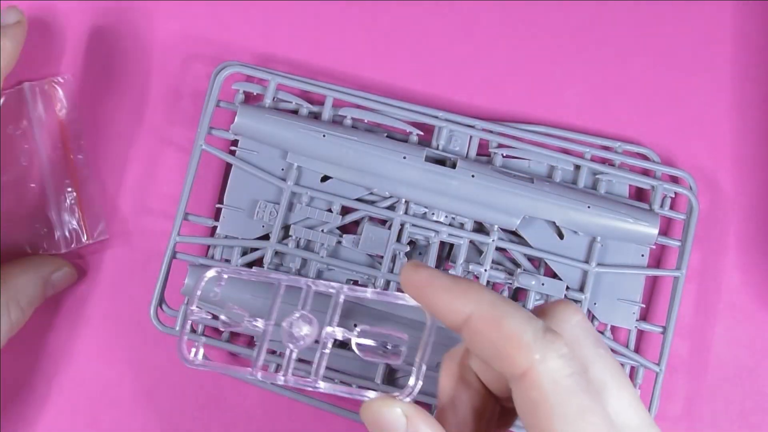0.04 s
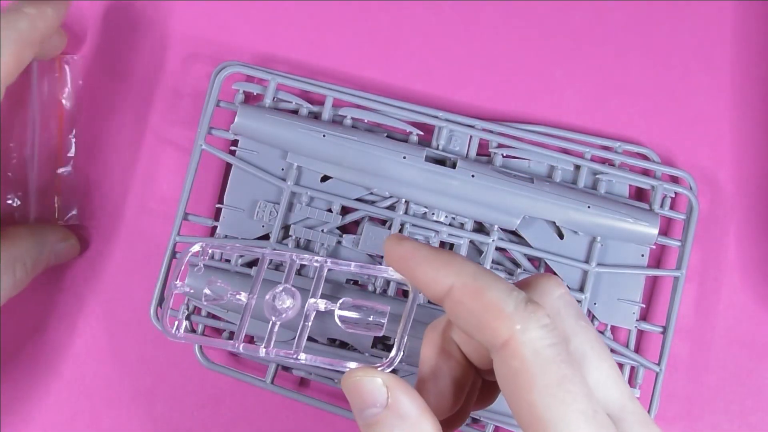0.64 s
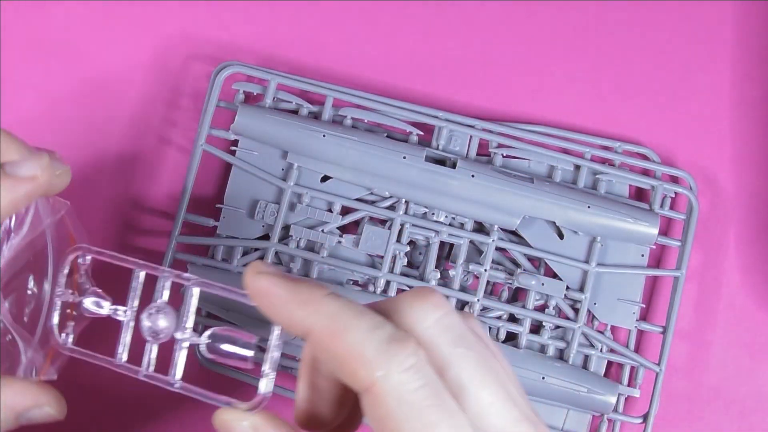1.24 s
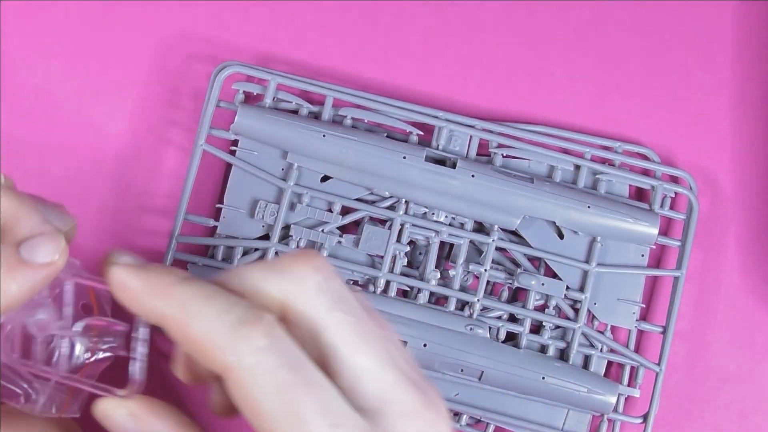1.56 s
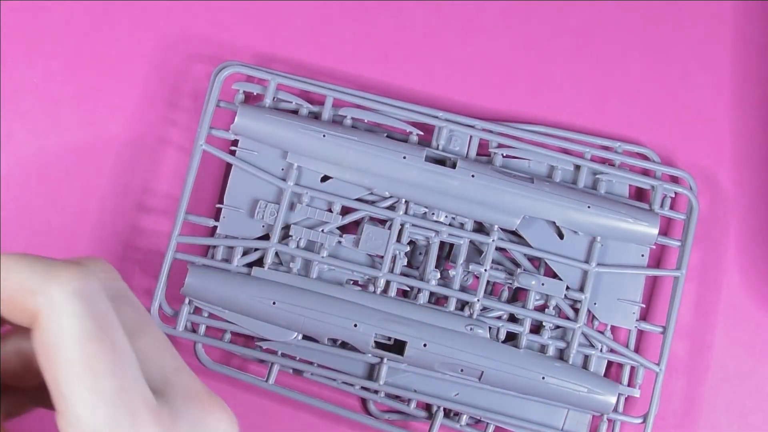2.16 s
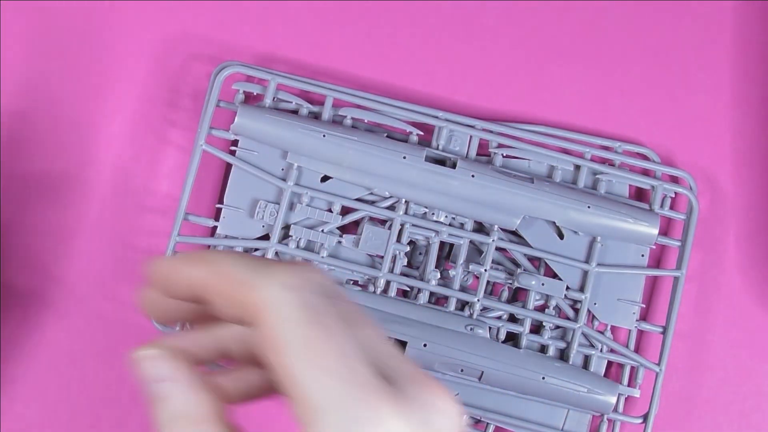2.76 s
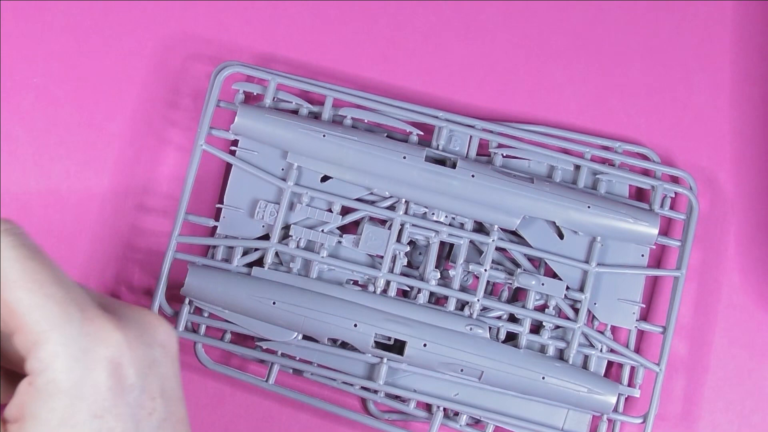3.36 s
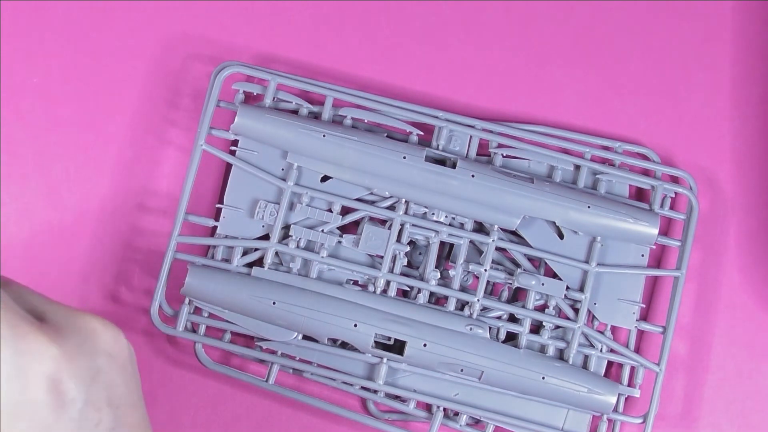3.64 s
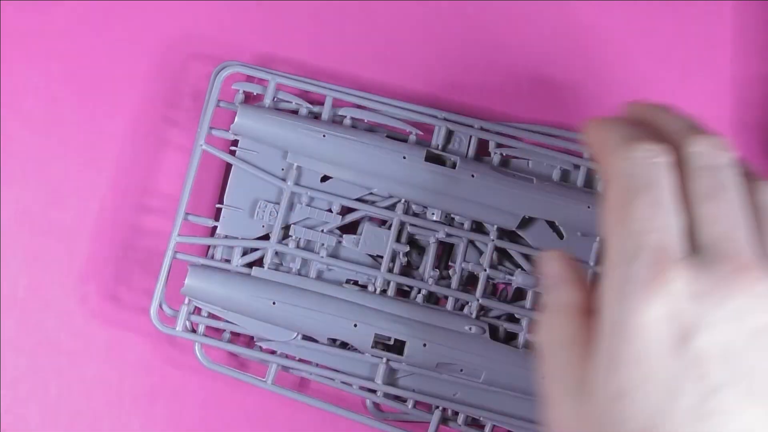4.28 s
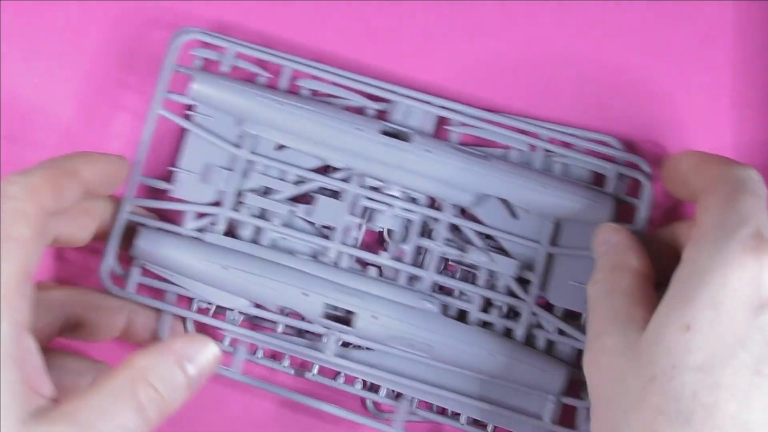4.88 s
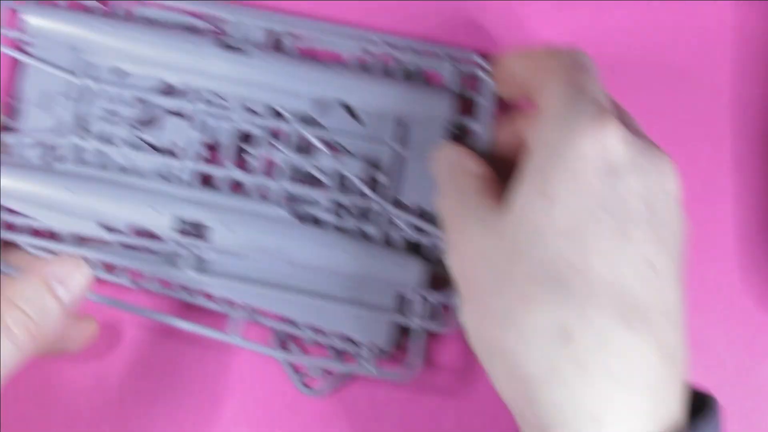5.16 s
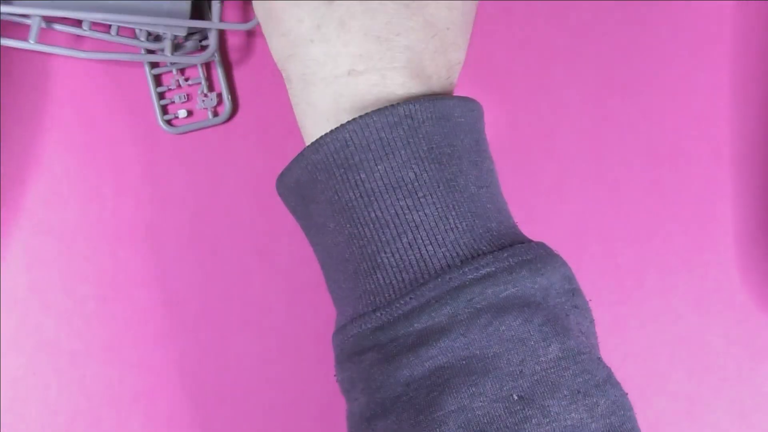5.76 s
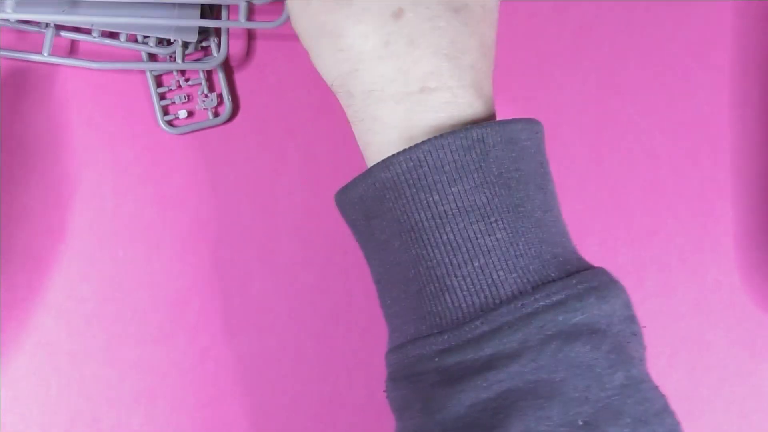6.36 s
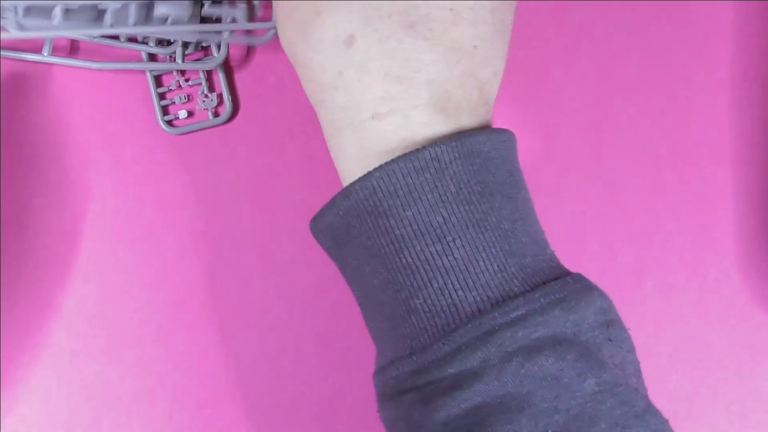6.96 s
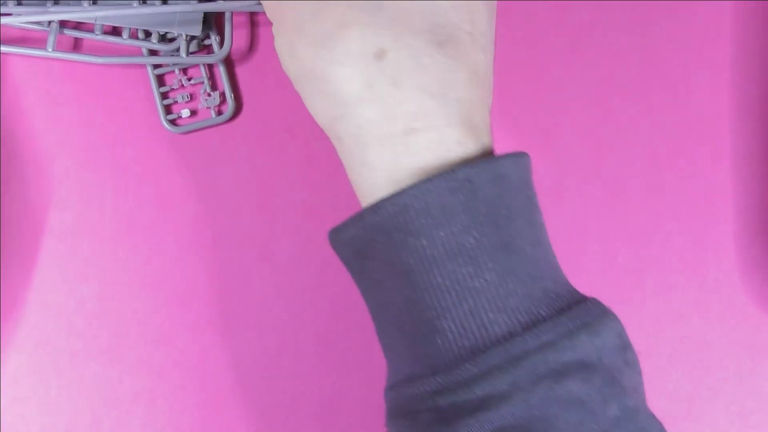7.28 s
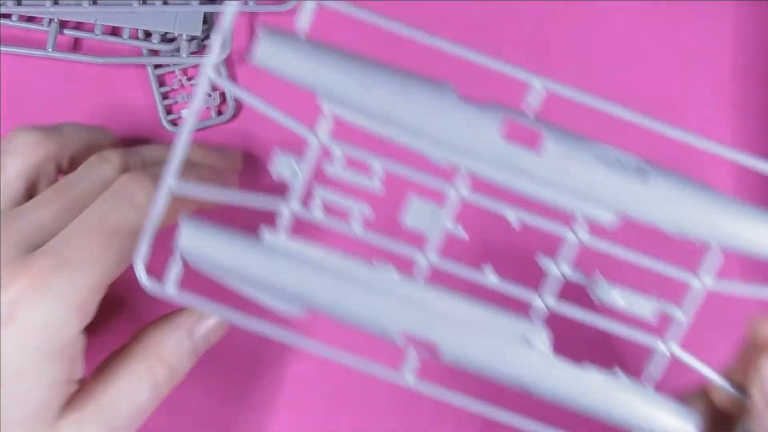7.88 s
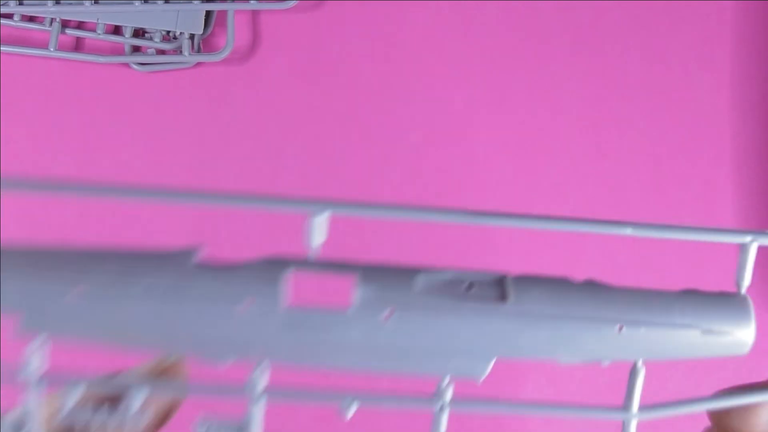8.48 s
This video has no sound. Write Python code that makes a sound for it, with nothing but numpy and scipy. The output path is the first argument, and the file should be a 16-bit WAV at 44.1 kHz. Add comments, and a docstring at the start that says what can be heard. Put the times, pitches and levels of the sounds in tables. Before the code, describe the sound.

A thin plastic bag crinkles and snaps, then plastic model part frames scrape and clatter on a table, with one louder knock.

```python
"""Plastic model parts handled on a covered table. A thin bag crinkles, snaps and rubs as a clear part is
slipped in; then a stack of part frames scrapes away, clatters down with one loud knock, and the top
frame is pulled off with a faint squeak. The table rumbles and booms underneath. A small, lively room
answers the handling; dull ticks from inside the camera reach its stereo microphone over a steady hush."""
import sys
import numpy as np
from scipy import signal
from scipy.fft import rfft, irfft
from scipy.io import wavfile

SR = 44100
rng = np.random.default_rng(int(sys.argv[2]) if len(sys.argv) > 2 else 0)


def generate_wav(sig):
    """Save sig (samples, or channels by samples) to the path in sys.argv[1] as 16-bit PCM at SR."""
    pcm = np.round(np.clip(np.atleast_2d(sig).T, -1, 1) * 32767).astype(np.int16)
    wavfile.write(sys.argv[1], SR, pcm)


N = 376173
TIME_S = np.arange(N) / SR

# Event levels are relative within each table; gains follow.
# Bag squeezes. Each row: start in seconds, length in seconds, crinkle in dB, rubbing in dB.
BAG_SQUEEZES = [(0.0, 0.045, -55, -64.5), (0.19, 0.12, -63, -72.5), (0.34, 0.11, -58.5, -64.5),
                (0.59, .17, -62, -69), (0.77, 0.18, -60, -65), (0.92, 0.11, -58, -70),
                (1.405, 0.055, -64.5, -62), (1.485, 0.13, -50, -53.5), (1.78, 0.2, -50.5, -55.5),
                (1.985, 0.034, -55, -52.5), (2.135, 0.039, -55.5, -69), (2.25, 0.12, -53, -60.5),
                (2.31, 0.049, -48.5, -59), (2.42, 0.056, -79, -61.5), (2.64, 0.17, -64, -68),
                (3.02, 0.13, -51, -56), (3.19, 0.075, -58, -58), (3.445, 0.023, -54.5, -54),
                (3.56, 0.15, -60.5, -58.5), (3.775, 0.018, -54.5, -55), (3.92, .1, -56.5, -53),
                (4.025, 0.084, -51.5, -60.5), (4.23, 0.17, -55, -62), (4.375, 0.017, -56.5, -55.5)]
# Weight landing on the table. Each row: start in seconds, level in dB.
TABLE_BOOMS = [(0.202, -61), (0.682, -56.5), (0.905, -62), (4.391, -57), (5.003, -49.5), (6.192, -51),
               (7.086, -46.5), (7.266, -49), (8.06, -45.5)]
# Clearest camera ticks. Each row: time in seconds, level in dB.
CLEAR_TICKS = [(0.2778, -41.5), (0.3125, -40.5), (0.3492, -42.5), (0.4286, -43.5), (0.5888, -41.5),
               (0.9105, -41), (0.9451, -39.5), (0.989, -44), (1.0688, -42), (1.2314, -41), (2.189, -41.5),
               (2.5097, -43), (2.8292, -43.5), (3.1503, -42.5), (3.469, -45), (3.7903, -45), (4.107, -42.5),
               (4.4283, -41.5), (4.7488, -37), (4.8274, -41.5), (4.9094, -39.5), (5.3885, -45),
               (6.0297, -42.5), (6.348, -46), (6.669, -46.5), (6.9895, -44)]
# Runs of fainter ticks. Each row: start in seconds, end in seconds, level in dB.
FAINT_TICK_RUNS = [(0.261, .54, -47.5), (0.707, .76, -46), (0.854, 1.09, -47.5)]
# Snaps of film or plastic. Each row: start in seconds, bright level in dB, ring in Hz, hollow level in dB.
PLASTIC_SNAPS = [(0.8276, -45, 7800, -55), (0.8553, -32, 6200, -46), (0.9682, -37, 9400, -34),
                 (1.138, -43.5, 7030, -49), (1.375, -59, 5800, -69), (1.487, -39, 10300, -50),
                 (1.494, -35.5, 7160, -44.5), (1.5325, -36.5, 7950, -59), (1.5665, -33.5, 7400, -47),
                 (1.5943, -36, 9500, -56), (1.6036, -48, 7200, -62), (1.6221, -33, 7400, -51),
                 (1.7896, -42, 7750, -37.5), (1.8424, -34.5, 6330, -37), (1.8746, -38.5, 6900, -53),
                 (2.0119, -35, 7000, -38), (2.145, -42.5, 8150, -37), (2.334, -35, 7300, -34.5),
                 (2.7997, -44.5, 5900, -51), (3.036, -45, 7250, -39.5), (3.0743, -41, 8600, -57),
                 (3.123, -41, 7800, -43), (3.2321, -43.5, 8100, -48), (3.4938, -38.5, 8600, -56),
                 (3.59, -50, 7400, -57), (3.7158, -43, 7000, -72), (3.81, -41.5, 7400, -39.5),
                 (4.2505, -43, 8200, -44.5), (4.2787, -45, 8700, -43.5), (4.3953, -69, 3850, -35),
                 (4.657, -43, 6900, -48), (6.814, -54, 6750, -67), (6.9704, -43.5, 7140, -47.5),
                 (7.058, -23, 7900, -34.5), (7.737, -78, 3500, -45.5)]
# Short shoves of the frames. Each row: start in seconds, length in seconds, scrape in dB, rasp in dB.
FRAME_SHOVES = [(4.505, .12, -56, -60.5), (4.635, 0.16, -51.5, -61), (4.84, 0.43, -52, -59),
                (5.67, 0.3, -57.5, -62.5), (5.95, 0.2, -52, -64.5), (6.19, 0.093, -62, -65.5),
                (6.39, 0.12, -57.5, -72), (6.6, 0.04, -70, -84), (7.012, .055, -43, -60),
                (7.072, 0.021, -26.5, -44), (7.26, 0.054, -48.5, -57.5), (7.43, 0.08, -63, -74),
                (7.85, 0.28, -63.5, -65.5), (8.04, 0.018, -38, -47), (8.44, 0.012, -56.5, -85)]
# Frame striking frame. Each row: start in seconds, level in dB, decay time in seconds.
FRAME_CLATTERS = [(4.995, -37, 0.0072), (5.004, -29, .015), (5.676, -35, 0.0053), (5.907, -41, 0.0028),
                  (5.959, -29.5, 0.0081), (5.985, -38, 0.0049), (6.038, -35, 0.0034), (6.052, -31, 0.0031),
                  (6.171, -42, .0045), (6.204, -41, 0.0072), (6.416, -48, .0041), (6.468, -47.5, 0.0084),
                  (6.607, -45, 0.015), (7.026, -39.5, 0.015), (7.068, -28.5, 0.0049), (7.079, -19, 0.012),
                  (7.086, -23, 0.0046), (7.151, -19.5, 0.006), (7.266, -28, 0.0054), (7.289, -37, 0.01),
                  (7.324, -34, 0.0044), (8.006, -43.5, 0.051), (8.034, -32, 0.0098), (8.062, -33.5, 0.034),
                  (8.218, -43, 0.0041), (8.453, -46, 0.0077)]
# Frame striking table. Each row: start in seconds, level in dB, pitch in Hz, decay time in seconds.
FRAME_BUMPS = [(4.998, -42, 300, 0.007), (5.699, -41, 364, 0.0098), (5.7142, -37.5, 421, 0.0043),
               (5.729, -45, 466, 0.012), (5.96, -50, 326, 0.031), (6.205, -51, 342, 0.0095),
               (7.065, -37.5, 276, 0.012), (7.095, -43, 336.5, 0.036), (7.11, -50, 177, 0.043),
               (7.139, -49, 322, 0.037), (7.27, -53, 176.5, 0.062), (7.859, -35, 455, 0.0027),
               (7.869, -51, 465, .012), (8.03, -39.5, 309, 0.013)]
# Squeak of the top frame dragging free. Each row: time in seconds, pitch in Hz, level in dB.
SQUEAK_CURVE = [(7.875, 1270, -66), (7.905, 1304, -53.5), (7.96, 1302, -60), (8.03, 1350, -57),
                (8.05, 1330, -81)]

# Spectra of the sources. Each row: frequency in Hz, relative gain in dB.
HUSH_SPECTRUM = [(15, -30), (25, -10), (36, 2.5), (72, -3), (734, -5), (1020, -8), (1740, -18.5),
                 (2110, -11), (2350, -13), (2690, -27), (3920, -14), (5000, -26), (7110, -7), (10100, -18),
                 (16000, -16)]
FILM_SPECTRUM = [(880, -41.5), (1500, -14.5), (1670, -9.5), (2320, -6.5), (2770, -9.5), (4160, -3.5),
                 (5020, -11), (5830, -4), (7460, -1), (8920, -3.5), (12400, -12.5), (15200, -22),
                 (16000, -14.5)]
RUB_SPECTRUM = [(150, -26.5), (300, -7), (480, -5), (700, 0.5), (850, -2.5), (1100, -5), (1350, -7.5),
                (1650, -20), (2500, -46)]
TABLE_SPECTRUM = [(20, -28), (55, -11.5), (95, -16), (121, 0.5), (145, -13), (175, -4), (200, -10),
                  (315, -7), (380, -9), (550, -10), (1000, -13.5), (2000, -22.5)]
HOLLOW_SPECTRUM = [(300, -29.5), (900, -10), (1600, -16), (2300, -11.5), (3500, -15), (6000, -23.5)]
SCRAPE_SPECTRUM = [(2650, -27), (4500, -7), (5080, -10.5), (6740, 1.5), (8240, -0.5), (12200, -12.5),
                   (15200, -21.5), (16000, -41)]
RASP_SPECTRUM = [(260, -27.5), (450, -9.5), (510, -33), (768, -13.5), (852, -32.5), (1260, -4.5),
                 (1630, -18), (1990, 1), (2840, -1.5), (3810, 5), (5060, -9.5), (5500, 0.5), (7150, -34),
                 (12100, -120)]
FRAME_SPECTRUM = [(400, -24), (550, -9.5), (1000, -10), (1600, -17.5), (2150, -7), (3100, -9), (3600, -4),
                  (4000, -1.5), (4450, -2), (5000, -8), (6300, 4), (7900, 8), (10000, -4), (16000, -35)]

# Room decay. Each row: frequency in Hz, time to fall 60 dB in seconds.
ROOM_T60 = [(100, 0.68), (400, 0.59), (1500, 0.64), (4000, 0.24), (8000, 0.2), (15000, 0.17)]
# Stereo width and balance by frequency.
# Each row: frequency in Hz, side gain in dB, left over right in dB, left lead in radians.
STEREO_IMAGE = [(101, 4.5, 2, -0.47), (452, 3, 1.65, -0.7), (990, -4.5, -0.1, -0.65), (2730, -15.5, 1, 0),
                (6450, -35.5, -1.2, 0), (9350, 1.5, -1.5, -0.14), (12100, 0.5, 0, 2), (15000, -8, 1, .8)]


def amp(db):
    """Decibels to gain."""
    return 10 ** (np.asarray(db) / 20)


def unit(x):
    """Scales to an rms of 1."""
    return x / np.sqrt(np.mean(x ** 2) + 1e-20)


def lookup(rows, hz, column=1):
    """One table column, interpolated over log frequency."""
    columns = np.transpose(rows)
    return np.interp(np.log(hz + 1), np.log(columns[0] + 1), columns[column])


def add(mix, start_s, sound):
    """Mixes a sound in, in place."""
    part = mix[max(round(start_s * SR), 0):][:len(sound)]
    part += sound[:len(part)]


def treble(x, cutoff_hz):
    """Fourth-order high-pass."""
    return signal.sosfilt(signal.butter(4, cutoff_hz, "high", fs=SR, output="sos"), x)


def colour(x, spectrum, size=4096):
    """Rings x through a minimum-phase body; white input keeps its power."""
    hz = abs(np.fft.fftfreq(size, 1 / SR))
    log_gain = np.log(amp(np.maximum(lookup(spectrum, hz), -80)))
    ring = np.fft.ifft(np.exp(np.conj(signal.hilbert(log_gain)))).real[:size // 2]
    return signal.oaconvolve(x, ring / np.linalg.norm(ring))[:len(x)]


def wander(cutoff_hz):
    """Low-passed noise, rms 1."""
    rolloff = 1 + (np.fft.rfftfreq(N, 1 / SR) / cutoff_hz) ** 4
    return unit(irfft(rfft(rng.standard_normal(N)) / rolloff, N))


def grains(per_s, spread_db, clump_db, smooth):
    """Tiny uneven slips in clumps, over a share of smooth friction."""
    sizes = amp(spread_db * np.minimum(rng.exponential(1, N), 4)) * rng.choice([-1, 1], N)
    slips = unit(sizes * (rng.random(N) < per_s / SR))
    return unit((slips + smooth * rng.standard_normal(N)) * amp(clump_db * wander(41)))


def burst(decay_s, rise_s, spread_db, size=8192):
    """A flurry of contacts that builds and dies, with the energy of a unit-level decay."""
    t = np.arange(size) / SR
    flurry = rng.standard_normal(size) * amp(spread_db * rng.standard_normal(size))
    flurry *= np.exp(-t / decay_s) * (1 - np.exp(-t / rise_s))
    return flurry / np.linalg.norm(flurry) * np.sqrt(decay_s * SR / 2)


def strokes(rows, attack_s, sag_db_per_s, release_db_per_s):
    """Hand strokes swell, sag and die away; one gain curve per level column."""
    powers, t = np.zeros((2, N)), np.arange(SR) / SR
    for start_s, length_s, *levels_db in rows:
        fall_db = sag_db_per_s * np.minimum(t, length_s) + release_db_per_s * np.maximum(t - length_s, 0)
        shape = (1 - np.exp(-t / attack_s)) * amp(-fall_db)
        for power, db in zip(powers, levels_db):
            add(power, start_s, (amp(db) * shape) ** 2)
    return np.sqrt(powers)


def hush(level_db=-67):
    """Steady room noise, different at each port."""
    mid, side = (colour(rng.standard_normal(N), HUSH_SPECTRUM) for _ in range(2))
    return amp(level_db) * np.array([mid + side, mid - side])


def crackles(per_s=45, low_hz=3500, high_hz=10000, width_hz=3200, facets=6):
    """Single creases snap through, each coloured by its facet of film."""
    out = np.zeros(N)
    for hz in np.geomspace(low_hz, high_hz, facets):
        kicks = rng.uniform(-1.42, 1, N) * (rng.random(N) < per_s / facets / SR)
        out += signal.lfilter(*signal.iirpeak(hz, hz / width_hz, SR), kicks)
    return unit(colour(out, FILM_SPECTRUM))


def bag(creasing, pressing, fizz_db=-1, crackle_db=-7):
    """Creases buckle in the film while fingers and the clear part rub along it."""
    fizz = colour(grains(per_s=1700, spread_db=2, clump_db=2, smooth=1), FILM_SPECTRUM)
    creases = amp(fizz_db) * fizz + amp(crackle_db) * crackles()
    rubbing = colour(grains(per_s=800, spread_db=4.5, clump_db=3, smooth=0.76), RUB_SPECTRUM)
    return creasing * creases + pressing * rubbing


def table_rumble(pressing, scraping, rub_db=-8, scrape_db=-36, scrape_exponent=0.48):
    """Low table modes, driven in step with rubbing and less than in step with scraping."""
    pushes = grains(per_s=500, spread_db=2, clump_db=1.2, smooth=0.8)
    drive = np.hypot(amp(rub_db) * pressing, amp(scrape_db) * scraping ** scrape_exponent)
    return drive * colour(pushes, TABLE_SPECTRUM)


def table_booms(low_hz=121, low_decay_s=0.082, high_hz=321, high_decay_s=0.092, high_db=-5, rise_s=0.008):
    """Landing weight swings the table top up at two low modes."""
    out, t = np.zeros(N), np.arange(SR) / SR
    ring = np.sin(2 * np.pi * low_hz * t) * np.exp(-t / low_decay_s)
    ring += amp(high_db) * np.sin(2 * np.pi * high_hz * t) * np.exp(-t / high_decay_s)
    for start_s, db in TABLE_BOOMS:
        add(out, start_s, amp(db) * ring * (1 - np.exp(-t / rise_s)))
    return out


def camera_ticks(right_hz=300, left_hz=520, left_db=-14, gain_db=6, decay_s=0.00044, gap_s=0.032):
    """A soft push and pull inside the camera, probably its focus drive, near the right port."""
    out, t = np.zeros((2, N)), np.arange(-256, 256) / SR
    grid = [(s, db) for start_s, end_s, db in FAINT_TICK_RUNS for s in np.arange(start_s, end_s, gap_s)]
    late_s, uneven_db, speed_offsets = (rng.uniform(-1, 1, (256, 3)) * [gap_s / 2, 2, 0.2]).T
    faint = [(s + late, db + uneven) for (s, db), late, uneven in zip(grid, late_s, uneven_db)]
    for (time_s, db), speed in zip(CLEAR_TICKS + faint, 1 + speed_offsets):
        for port, hz, gain in zip(out, (left_hz, right_hz), (-amp(left_db), 1)):
            swing = np.sin(2 * np.pi * hz * t * speed) * np.exp(-abs(t) * speed / decay_s)
            add(port, time_s + t[0], gain * amp(db + gain_db) * swing / swing.max())
    return out


def snaps(ring_width_hz=2600, ring_gain=2.9, bright_gain_db=4):
    """Film or plastic snaps: a very short flurry with its own ring and a hollow lower part."""
    out = np.zeros(N)
    for start_s, bright_db, ring_hz, hollow_db in PLASTIC_SNAPS:
        crack = burst(decay_s=0.0017, rise_s=0.0011, spread_db=5.5)
        ring = signal.lfilter(*signal.iirpeak(ring_hz, ring_hz / ring_width_hz, SR), crack)
        bright = amp(bright_db + bright_gain_db) * unit(colour(crack + ring_gain * ring, FILM_SPECTRUM))
        hollow = amp(hollow_db) * unit(colour(crack, HOLLOW_SPECTRUM))
        add(out, start_s, np.std(crack) * (bright + hollow))
    return out


def frame_motion(push_start_s=4.964, push_length_s=0.76, scrape_db=-45, rasp_db=-46.5, rasp_exponent=1.47):
    """Scrape and rasp gains: short shoves plus one long push, where rasp grows faster with speed."""
    scraping, rasping = strokes(FRAME_SHOVES, attack_s=0.0082, sag_db_per_s=20, release_db_per_s=115)
    progress = np.clip((TIME_S - push_start_s) / push_length_s, 0, 1)
    speed = abs(np.sin(np.pi * progress))
    push_scrape, push_rasp = amp(scrape_db) * speed, amp(rasp_db) * speed ** rasp_exponent
    return np.hypot(scraping, push_scrape), np.hypot(rasping, push_rasp)


def frame_slide(scraping, rasping, scrape_db=-1):
    """Frames dragged over the table cover hiss, and rasp when pressed."""
    scrape = colour(grains(per_s=5000, spread_db=3, clump_db=1.2, smooth=0.8), SCRAPE_SPECTRUM)
    rasp = colour(grains(per_s=3000, spread_db=2.5, clump_db=0.8, smooth=0.7), RASP_SPECTRUM)
    return amp(scrape_db) * scraping * scrape + rasping * rasp


def frame_clatters(crack_db=-2):
    """Stacked frames chatter against each other; the hardest contacts add a bright crack."""
    contacts, cracks = np.zeros(N), np.zeros(N)
    hardest_db = max(db for _, db, _ in FRAME_CLATTERS)
    for start_s, db, decay_s in FRAME_CLATTERS:
        flurry = amp(db) * burst(decay_s, rise_s=0.0017, spread_db=-1)
        add(contacts, start_s, flurry)
        add(cracks, start_s, amp(db - hardest_db) * flurry)
    return colour(contacts, FRAME_SPECTRUM) + amp(crack_db) * treble(cracks, cutoff_hz=10500)


def frame_bumps(gain_db=-2, upper_db=-9, upper_ratio=1.5):
    """A bump on the table swings two low bending modes of a frame."""
    out, t = np.zeros(N), np.arange(SR // 3) / SR
    for start_s, db, hz, decay_s in FRAME_BUMPS:
        swing = np.sin(2 * np.pi * hz * t) + amp(upper_db) * np.sin(2 * np.pi * hz * upper_ratio * t)
        add(out, start_s, amp(db + gain_db) * swing * np.exp(-t / decay_s))
    return out


def frame_judder(start_s=7.61, end_s=7.84, rate_hz=50, level_db=-43):
    """Faint, even ticking as the top frame is drawn off."""
    kicks = np.zeros(N)
    kicks[(np.arange(start_s, end_s, 1 / rate_hz) * SR).astype(int)] = 1
    return amp(level_db) * colour(kicks, HOLLOW_SPECTRUM)


def frame_squeak(waver=0.028, flutter_db=2, low_ratio=0.34, low_db=-4):
    """Plastic sticks and slips on plastic, swinging two modes unsteadily."""
    times_s, hz, db = np.transpose(SQUEAK_CURVE)
    pitch_hz = np.interp(TIME_S, times_s, hz)
    level_db = np.interp(TIME_S, times_s, db, left=-120, right=-120)
    high = np.sin(2 * np.pi * np.cumsum(pitch_hz * (1 + waver * wander(230))) / SR)
    low = np.sin(2 * np.pi * np.cumsum(pitch_hz * (low_ratio + 2 * waver * wander(120))) / SR)
    return amp(level_db + flutter_db * wander(110)) * (high + amp(low_db) * low)


def room(x, early_db=5, early_s=0.12, gap_s=0.0027):
    """Dense reflections at both ports, strong at first, each band dying at its own rate."""
    taps = rng.standard_normal((2, SR)) * (rng.random((2, SR)) < 1 / 6)
    hz, t, bands = signal.stft(taps, SR, nperseg=256)
    decay = np.exp(-np.log(1000) * t / lookup(ROOM_T60, hz)[:, None])
    tail = signal.istft(bands * decay, SR, nperseg=256)[1]
    t = np.arange(tail.shape[1]) / SR
    tail *= 1 + amp(early_db) * np.exp(-t / early_s)
    tail *= np.clip(t / gap_s - 1, 0, 1)
    return signal.fftconvolve(x[None], tail / np.linalg.norm(tail[0]), axes=1)[:, :N]


def scatter(x, side_db=-5, lag_s=0.0002):
    """Contacts lie all over the parts, so their treble shifts between the ports."""
    side = amp(side_db) * wander(180) * np.roll(treble(x, cutoff_hz=8300), round(lag_s * SR))
    return np.array([x + side, x - side])


def scene():
    """Handling arrives directly and through the room; booms, ticks and hush only directly."""
    snap, clatter, bump = snaps(), frame_clatters(), frame_bumps()
    creasing, pressing = strokes(BAG_SQUEEZES, attack_s=0.01, sag_db_per_s=16, release_db_per_s=112)
    scraping, rasping = frame_motion()
    friction = bag(creasing, pressing) + frame_slide(scraping, rasping) + frame_squeak() + frame_judder()
    rumble = table_rumble(pressing, scraping)
    send = amp(-4) * snap + amp(-8.5) * friction + amp(-1.5) * clatter + amp(0.5) * bump + amp(-3) * rumble
    direct = snap + amp(1) * friction + clatter + amp(3.5) * (bump + rumble)
    return room(send) + scatter(direct) + table_booms() + camera_ticks() + hush()


def record(dry, cutoff_hz=16100):
    """Stereo image: nearly mono from about 3 to 7 kHz, wide outside, then low-passed."""
    hz = np.fft.rfftfreq(N, 1 / SR)
    side_db, balance_db, lead_rad = (lookup(STEREO_IMAGE, hz, column) for column in (1, 2, 3))
    left, right = rfft(dry)
    mid, side = (left + right) / 2, (left - right) / 2 * amp(side_db)
    lean = amp(balance_db / 2) * np.exp(0.5j * lead_rad)
    stereo = irfft(np.array([(mid + side) * lean, (mid - side) / lean]), N)
    lowpass = signal.firwin(401, cutoff_hz, window=("kaiser", 8), fs=SR)
    return signal.oaconvolve(stereo, lowpass[None], "same")


dry = scene()
out = record(dry)
generate_wav(out)
```